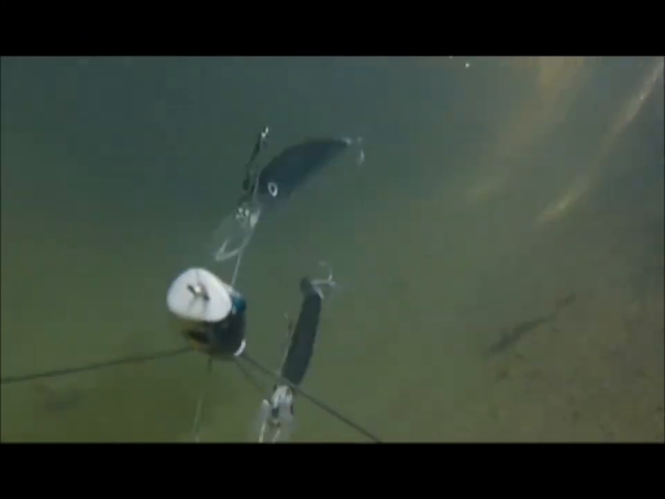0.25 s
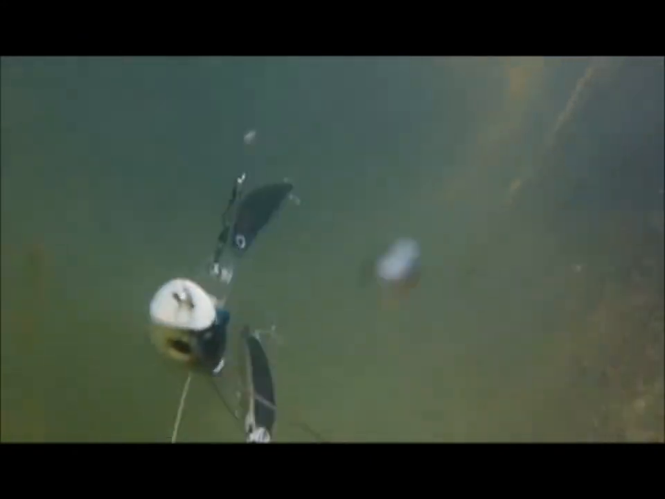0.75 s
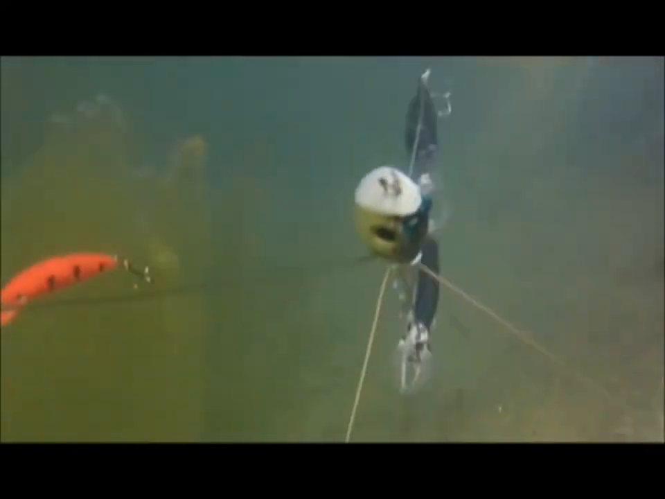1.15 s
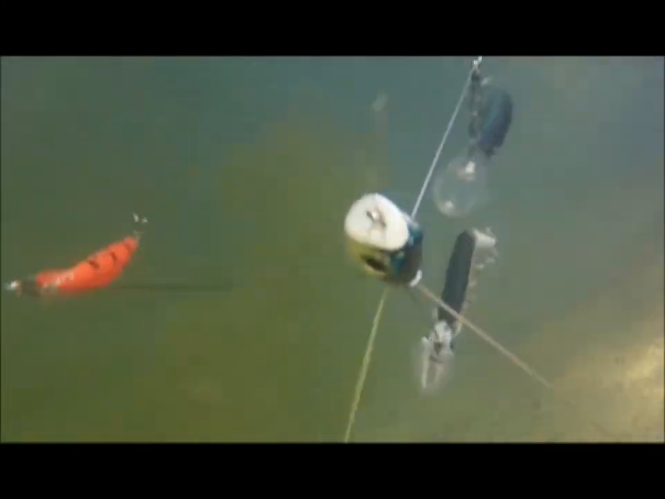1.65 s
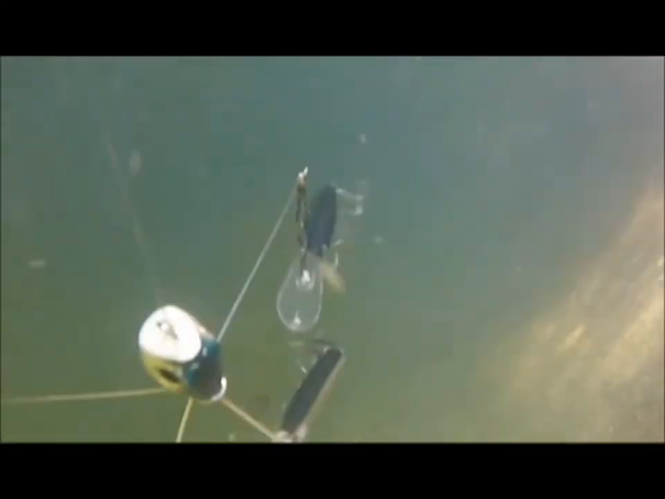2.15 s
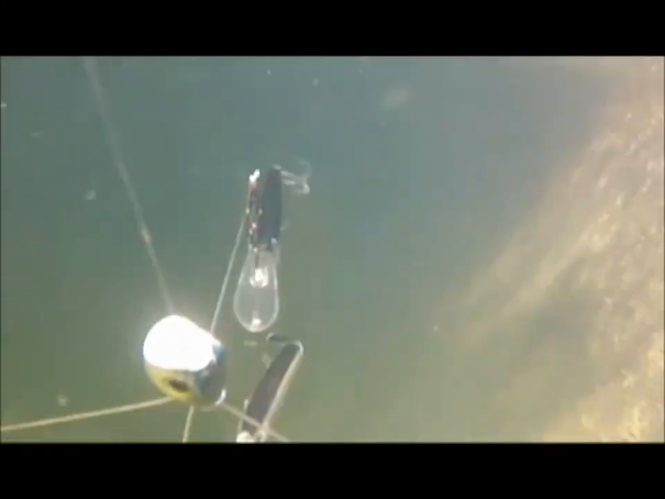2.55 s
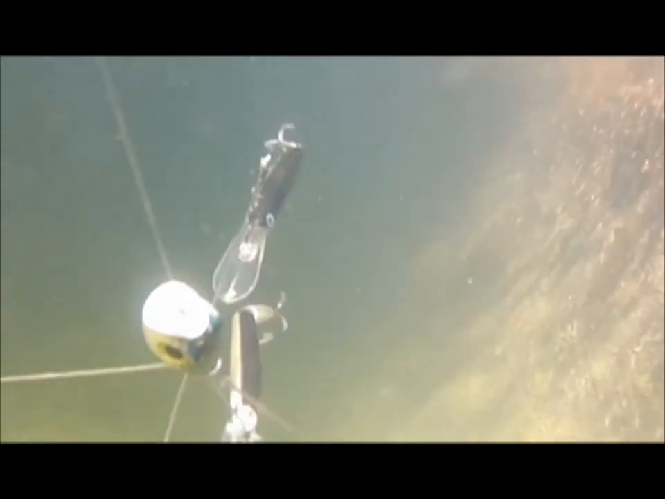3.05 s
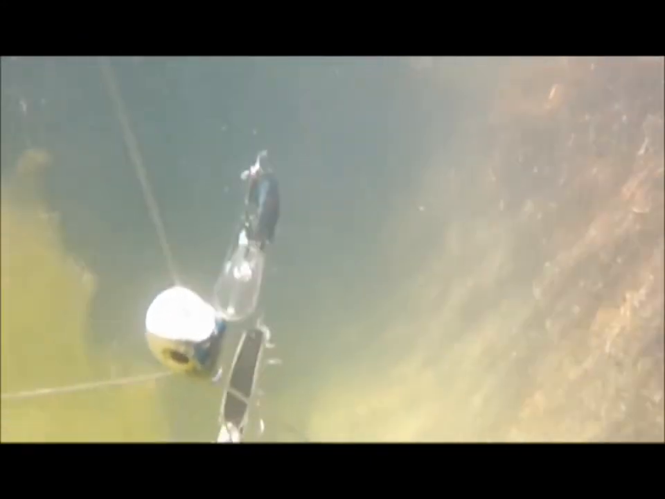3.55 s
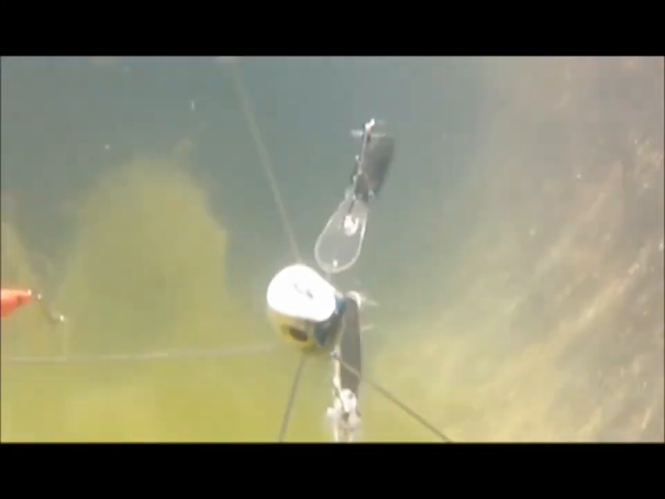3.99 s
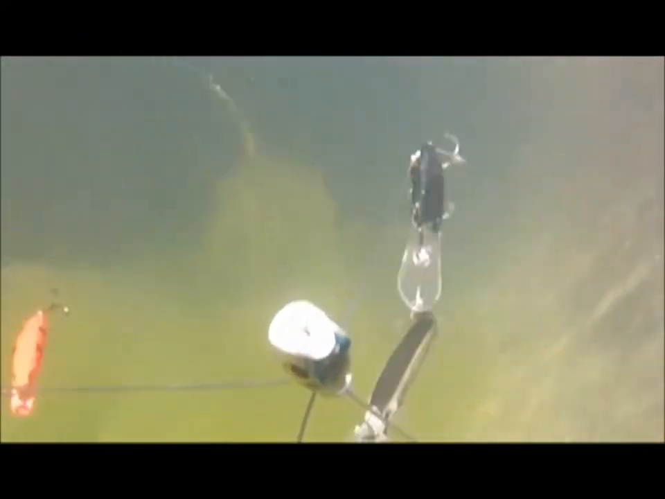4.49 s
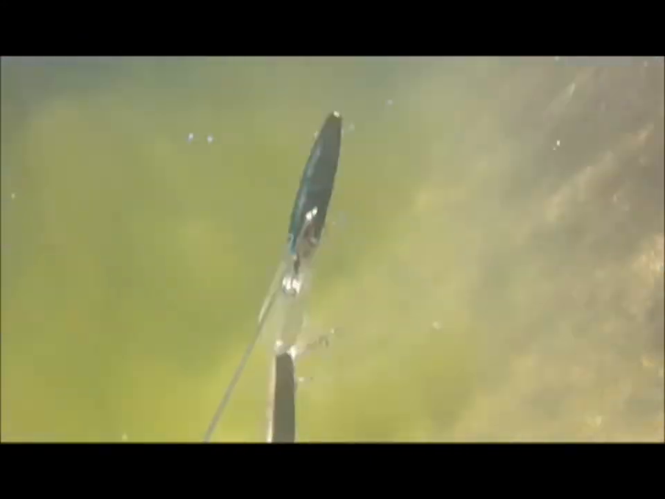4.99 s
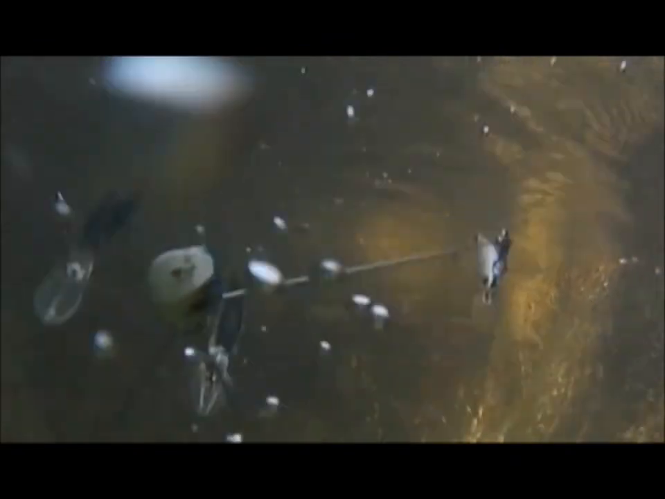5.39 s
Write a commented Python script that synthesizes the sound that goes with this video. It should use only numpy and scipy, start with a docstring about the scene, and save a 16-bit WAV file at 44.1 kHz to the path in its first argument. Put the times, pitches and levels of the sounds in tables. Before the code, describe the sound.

A close underwater microphone in a plastic case picks up deep flowing water, trapped air gulping around a mid-low note, and plinking bubbles. Fine steel clicks from fishing lures tick on top. A run of dull tugs near two seconds leaves a brief low line tone; a sparse quiet stretch follows, with a short gurgle, before tugs, chattering lures and a dense bubble burst close the scene.

```python
"""Fishing lures towed underwater

A camera in a sealed housing is towed through a lake behind a rig of fishing lures. Shaped noise makes the
water's rumble, hum, wash and hiss, and a wavering tone makes the ringing tow line. Fading tones make bubbles,
gulps of trapped air and lure ticks; noise through resonances makes the lures' chatter. Tugs push on the
housing's resonances, and near the end the bubbles thicken. Both channels are nearly alike."""
import sys
import numpy as np
from scipy import signal
from scipy.fft import rfft, irfft, next_fast_len
from scipy.io import wavfile
from scipy.ndimage import map_coordinates

SR = 44100
rng = np.random.default_rng(int(sys.argv[2]) if len(sys.argv) > 2 else 0)


def master_out(mix):
    """Clip the mix to full scale and print it as 16-bit PCM to the path in sys.argv[1]."""
    frames = np.transpose(np.atleast_2d(mix))
    ceiling = np.clip(frames, -1, 1)
    pcm = np.round(ceiling * 32767).astype(np.int16)
    wavfile.write(sys.argv[1], SR, pcm)


N = 248283  # length in samples

# In every table the dB values are relative: the functions below add their own trims.
# Fade times are the seconds taken to fall by 60 dB, held between 0.003 and 0.2 when played.

# Faint hiss. Each row: frequency in Hz, noise density in dB per Hz.
HISS_SPECTRUM = [(180, -61.5), (300, 25.5), (1010, -35), (1360, -8), (6100, -15.5), (7570, -48),
                 (9090, -9.5), (12100, -26), (16000, -17.5)]
# What differs between the channels. Each row: frequency in Hz, noise density in dB per Hz.
SIDE_SPECTRUM = [(59, -31), (100, -2), (482, -10), (558, -12), (2420, -17.5), (4730, -10), (15000, -11)]
# Flow past the housing. Each row: time in seconds, rumble level in dB, hum level in dB.
FLOW_LEVELS = [(0.0, -52.5, -63.5), (0.58, -58, -71), (1.18, -52.5, -61), (1.52, -56.5, -64),
               (1.83, -53, -64.5), (2.12, -55, -64), (2.22, -47, -53), (2.35, -50.5, -62),
               (2.59, -54, -70.5), (3.23, -56.5, -67), (4.03, -53, -68), (4.42, -61.5, -71),
               (5.0, -54.5, -82.5), (5.33, -50, -74), (5.43, -54.5, -59), (5.63, -54, -64)]
# Low rumble of the flow. Each row: frequency in Hz, noise density in dB per Hz.
RUMBLE_SPECTRUM = [(8.8, -20.5), (15, -2), (33, -1.5), (86, -18.5), (103, -20.5), (145, -20), (250, -64),
                   (320, -79), (550, -120)]
# Bubbly water churning at the port. Each row: time in seconds, wash level in dB, fizz level in dB.
CHURN_LEVELS = [(0, -74.5, -76), (.34, -72.5, -71), (.55, -70, -66), (.74, -72, -76), (1.15, -67.5, -69),
                (1.38, -75, -78), (1.74, -67.5, -69), (1.9, -73, -83), (2.15, -66, -85), (2.34, -77.5, -87),
                (2.42, -79.5, -85), (2.75, -78, -86), (2.93, -70.5, -72), (3.13, -78, -79),
                (3.95, -79.5, -81), (4.11, -74.5, -75.5), (4.24, -88, -79), (4.4, -63, -78),
                (4.68, -60, -74.5), (4.77, -74, -82), (4.92, -93, -88), (5.1, -68, -79), (5.36, -75, -75),
                (5.47, -62.5, -48), (5.55, -58, -54), (5.63, -57.5, -52)]
# Low wash of the churning water. Each row: frequency in Hz, noise density in dB per Hz.
WASH_SPECTRUM = [(88, -30.5), (150, -10), (210, -3), (300, -7.5), (404, -4), (441, -8), (572, -13),
                 (780, -15.5), (861, -31), (1160, -25.5), (1620, -29), (2180, -30.5), (2900, -40.5),
                 (3770, -78), (6380, -120)]
# Thin hiss within the fizz. Each row: frequency in Hz, noise density in dB per Hz.
FIZZ_SPECTRUM = [(410, -47.5), (700, -4), (787, -7), (943, -2), (1030, -30), (1250, -2), (1670, -4.5),
                 (1920, 0.5), (3070, -5.5), (4190, -14), (6260, -24.5), (7700, -20.5), (9470, -39.5),
                 (12100, -22), (15500, -46)]
# Taut line ringing on. Each row: time in seconds, level in dB.
LINE_LEVELS = [(2.3, -85), (2.37, -46.5), (2.6, -62.5), (2.66, -53), (2.8, -58.5), (2.9, -101)]
# Air pocket at the port, kept ringing by the flow. Each row: time in seconds, level in dB.
GURGLE_LEVELS = [(0.0, -58), (0.12, -69), (0.56, -79), (1.6, -89.5), (1.86, -61), (2.22, -74),
                 (2.38, -93.5), (4.01, -94), (4.22, -86.5), (4.61, -67.5), (4.77, -87), (5.02, -101),
                 (5.5, -70.5), (5.63, -59.5)]
# Gulps of the air pocket. Each row: start in seconds, level in dB, pitch in Hz, fade time in seconds.
AIR_GULPS = [(0.002, -37, 590, 0.027), (0.052, -48.5, 545, 0.1), (0.129, -43, 600, 0.032),
             (0.159, -47, 565, 0.072), (0.171, -42, 537, 0.094), (0.242, -37.5, 545, 0.047),
             (0.318, -36.5, 567, 0.025), (0.376, -53, 587, 0.087), (0.393, -51, 610.6, 0.16),
             (0.62, -49.5, 617, 0.042), (1.072, -37.5, 486, 0.019), (1.236, -49, 590, 0.041),
             (1.631, -47, 565, 0.063), (1.718, -36.5, 583, 0.054), (1.762, -38.5, 573, 0.051),
             (1.789, -55, 580.5, 0.23), (1.844, -39.5, 576, 0.16), (1.981, -55, 527, 0.065),
             (2.845, -50, 590, 0.025), (2.93, -50, 589, 0.042), (3.206, -75, 570, 0.051),
             (4.007, -57, 576, 0.047), (4.033, -58, 579, 0.15), (4.051, -35, 569, 0.024),
             (4.139, -50, 564, 0.047), (4.153, -41, 520, 0.021), (4.186, -54, 541, 0.066),
             (4.591, -57.5, 583, 0.29), (4.627, -49, 584, 0.06), (5.181, -41, 560, 0.022),
             (5.467, -72, 610, 0.042), (5.546, -51, 510, 0.036), (5.572, -45, 683, 0.089),
             (5.596, -36, 535, 0.056), (5.614, -50, 595, 0.07)]
# Soft-starting bubbles drifting free. Each row: start in seconds, level in dB, pitch in Hz,
# fade time in seconds.
FREE_BUBBLES = [(0.341, -59, 1710, 0.021), (.553, -47, 1370, 0.032), (.75, -55, 682, 0.07),
                (.914, -45.5, 2280, 0.031), (.965, -53.5, 860, 0.042), (1.114, -55.5, 847, 0.12),
                (1.164, -50, 2170, 0.025), (1.24, -40, 1412, 0.043), (1.358, -53, 1700, 0.044),
                (1.848, -58, 2130, 0.092), (2.979, -58, 1410, 0.037), (2.992, -60, 1390, 0.034),
                (2.995, -67, 2680, 0.016), (3.016, -58, 2320, 0.019), (3.073, -56.5, 580, 0.027),
                (3.114, -53.5, 3000, 0.024), (3.129, -61, 1650, 0.038), (4.011, -60, 1590, 0.062),
                (4.141, -59, 823, 0.14), (4.198, -51, 567, 0.038), (4.226, -51.5, 553, 0.025),
                (4.228, -65.5, 1145, 0.071), (5.197, -46, 2150, 0.015), (5.324, -50.5, 1800, 0.031),
                (5.333, -54, 980, 0.096), (5.493, -32, 2240, 0.026), (5.547, -40, 765, 0.038),
                (5.565, -49, 1410, 0.055), (5.61, -45.5, 1364, 0.061), (5.62, -44, 2070, 0.047)]
# Bubbles popping at the shell. Each row: start in seconds, level in dB, pitch in Hz,
# fade time in seconds, level of the knock over the ping in dB.
SHELL_BUBBLES = [(0.1863, -38.5, 3760, 0.009, -11), (0.2382, -46.5, 1380, 0.044, -34),
                 (0.3157, -55.5, 940, 0.06, -17), (0.3166, -54, 1975, 0.038, -12),
                 (0.3743, -57, 1220, 0.053, -22), (0.4129, -33.5, 2570, 0.006, -8.5),
                 (0.4347, -34.5, 2040, 0.0077, -12.5), (0.5097, -33.5, 1885, 0.014, -14.5),
                 (0.5359, -34.5, 1760, 0.012, -15), (0.5478, -34.5, 2330, 0.016, -18),
                 (0.6206, -29.5, 3490, 0.013, -14.5), (0.6855, -49, 1380, 0.037, -10),
                 (0.718, -55.5, 920, 0.031, -7), (0.8045, -48, 1470, 0.044, -31),
                 (0.8832, -59, 940, 0.057, -3), (0.9018, -59, 1390, 0.12, -11),
                 (0.9411, -55.5, 1560, 0.043, -9), (1.0237, -60, 1240, 0.011, 4),
                 (1.056, -55.5, 1390, 0.035, -19), (1.0707, -36, 1305, 0.013, -42),
                 (1.1068, -38.5, 1575, 0.018, -2.5), (1.1069, -30, 3320, 0.0089, -20),
                 (1.1303, -50, 2240, 0.023, -9), (1.1629, -61.5, 1400, 0.085, -8),
                 (1.1833, -55, 1530, 0.055, 2), (1.2116, -48.5, 2060, 0.023, -5),
                 (1.2491, -53, 1077, 0.024, -22), (1.2526, -24.5, 2234, 0.006, -10),
                 (1.2527, -25.5, 2930, 0.0076, -46), (1.2983, -54, 1760, 0.021, -12),
                 (1.3536, -58, 1240, 0.098, 2.5), (1.5993, -64.5, 1320, 0.17, 8),
                 (1.65, -59.5, 1048, 0.095, -6), (1.6742, -53.5, 1046, 0.039, -5),
                 (1.715, -48.5, 1305, 0.02, -9), (1.76, -58, 2550, 0.018, -1), (1.7848, -60, 1180, 0.1, -5),
                 (1.8364, -47.5, 1344, 0.066, -5.5), (1.8833, -42.5, 1300, 0.043, -10.5),
                 (2.0627, -41, 860, 0.02, -7.5), (2.1162, -66, 1090, 0.033, 4.5),
                 (2.188, -60, 1000, 0.014, -0.5), (2.2167, -63, 1350, 0.032, -2),
                 (2.2408, -59.5, 1200, 0.026, -7), (2.2982, -66.5, 1160, 0.021, 5.5),
                 (2.3236, -63, 1280, 0.03, -0.5), (2.4157, -56, 1240, 0.02, -16),
                 (2.557, -65, 1356, 0.064, -1.5), (2.6006, -67, 1450, 0.067, 2),
                 (2.6173, -58.5, 1160, 0.019, 2.5), (2.7612, -62.5, 2440, 0.03, -9),
                 (2.826, -73, 1650, 0.019, 9), (2.8464, -41.5, 1360, 0.04, -30),
                 (2.8838, -62, 2200, 0.022, -6), (2.8976, -53, 2300, 0.018, -1),
                 (2.9115, -54, 1257, 0.062, -17), (2.9299, -50, 1865, 0.033, -3),
                 (2.9616, -54.5, 1730, 0.026, -8), (3.1687, -68, 2000, 0.04, 1),
                 (3.2062, -48, 2555, 0.019, -9), (3.2577, -58, 2130, 0.019, -10),
                 (3.434, -65.5, 2210, 0.046, 7), (3.491, -66.5, 1380, 0.013, 8),
                 (3.7015, -54, 3320, 0.018, -10), (3.7573, -60.5, 2320, 0.04, -20),
                 (3.784, -58, 2700, 0.019, -5), (3.8698, -59.5, 2640, 0.028, -12),
                 (4.007, -51, 1385, 0.025, -5), (4.0506, -54, 1590, 0.056, -1.5),
                 (4.139, -57.5, 2250, 0.035, -9), (4.1958, -57.5, 1287, 0.065, -2),
                 (4.2841, -58, 1280, 0.05, 0), (4.5285, -58.5, 1164, 0.09, -9),
                 (4.8778, -62, 1390, 0.059, -3), (5.013, -54, 3040, 0.01, -15),
                 (5.0939, -62.5, 1160, 0.012, 1.5), (5.104, -57.5, 1820, 0.042, 3.5),
                 (5.1817, -40, 1250, 0.027, -41), (5.214, -43, 2000, 0.0083, -30),
                 (5.242, -45, 2190, 0.014, -15.5), (5.2659, -53, 1260, 0.025, 4),
                 (5.343, -61.5, 990, 0.012, 9.5), (5.3736, -45.5, 3020, 0.043, -7),
                 (5.3779, -51, 1980, 0.039, -11), (5.4018, -53, 2370, 0.032, -4),
                 (5.4157, -52, 2230, 0.062, -22), (5.4475, -54, 2000, 0.035, -16),
                 (5.462, -32.5, 2210, 0.022, -5), (5.474, -36.5, 1896, 0.035, 2.5),
                 (5.531, -44, 3370, 0.012, 0), (5.5192, -52, 1325, 0.16, 14.5),
                 (5.5848, -49, 1336, 0.082, -9)]
# High resonances of the shell. Each row: centre in Hz, width in Hz, strength in dB.
SHELL_MODES = [(577, 190, 4.5), (876, 40, -0.5), (1360, 420, 2), (1840, 170, -16), (2157, 170, 3),
               (2820, 190, -7), (3330, 120, -5.5)]
# Lures shaking between the ticks. Each row: time in seconds, level in dB.
SHAKE_LEVELS = [(0, -73.5), (1.74, -75.5), (1.88, -71), (1.95, -83.5), (2.44, -85.5), (2.5, -78),
                (4.2, -77), (4.64, -81), (5.33, -78), (5.39, -65.5), (5.55, -58.5), (5.63, -89)]
# Lure ticks, from sharp to barely heard. Each row: start in seconds, level in dB, pitch in Hz.
LURE_TICKS = [(0.0927, -55, 7800), (0.1504, -46, 7740), (0.325, -48, 4860), (0.434, -41, 12000),
              (0.5364, -33, 6300), (0.62, -89, 4500), (0.6673, -51, 6400), (0.8444, -48, 4560),
              (1.1066, -47, 4430), (1.108, -40, 12800), (1.162, -48, 11040), (1.2515, -57, 4760),
              (1.275, -40, 7160), (1.2989, -69, 5080), (1.4986, -47, 7060), (1.6078, -46, 5100),
              (1.6993, -46, 5100), (1.809, -53, 4990), (1.8367, -75, 4500), (2.0163, -57, 4650),
              (2.066, -60, 4530), (2.299, -74, 4400), (2.568, -45, 7600), (2.763, -45.5, 7650),
              (2.8474, -76, 5400), (2.939, -50, 4530), (3.0365, -85, 5510), (3.0799, -62, 5070),
              (3.1447, -51, 7800), (3.3158, -44.5, 7770), (3.5151, -46, 7540), (3.6132, -55, 5200),
              (3.706, -46, 7720), (3.828, -84, 4900), (3.911, -46, 7700), (3.9568, -62, 11800),
              (4.0068, -42, 11660), (4.055, -43, 7840), (4.1176, -60, 5030), (4.2134, -74, 4950),
              (4.286, -44, 7260), (4.3086, -46, 4940), (4.4058, -52, 4900), (4.501, -43.5, 6700),
              (4.701, -42, 6800), (4.7267, -46, 4970), (4.787, -52, 5460), (4.896, -44, 6600),
              (4.9264, -60, 4280), (5.0573, -39.5, 7500), (5.094, -56, 4730), (5.1264, -47, 12200),
              (5.1926, -72, 12300), (5.2155, -68, 4940), (5.2436, -44.5, 8500), (5.344, -44, 12900),
              (5.3735, -35, 7450), (5.4124, -35, 6000), (5.441, -38, 7600), (5.5685, -42, 4970),
              (5.599, -37.5, 4900)]
# Resonances of the steel in the lures. Each row: centre in Hz, width in Hz, strength in dB.
STEEL_MODES = [(4850, 1770, 4), (5590, 640, -10), (6650, 830, 0.5), (7630, 850, 2.5), (11690, 2700, -3.5),
               (14400, 1900, -19.5)]
# Pushes that make up the tugs on the housing. Each row: time in seconds, level in dB,
# spread of the push in ms, direction +1 or -1.
TUG_PUSHES = [(1.0257, -28, 0.79, 1), (1.047, -33, 1.45, -1), (1.056, -34.5, 1.43, 1),
              (1.239, -35, 0.59, -1), (1.261, -22, 0.88, 1), (1.2604, -54, 1.7, -1),
              (1.876, -44.5, 0.33, -1), (1.8776, -32, 0.47, 1), (1.8888, -15, 1.18, 1),
              (1.911, -21, 1.02, 1), (2.047, -37.5, 0.97, 1), (2.0657, -19.5, 0.88, 1),
              (2.093, -24.5, 0.95, 1), (2.1163, -28.5, 0.71, 1), (2.13, -38.5, 0.54, 1),
              (2.1447, -24, 1.2, 1), (2.158, -40.5, 0.62, 1), (2.1875, -26, 0.87, 1),
              (2.2178, -32, 0.66, 1), (2.2431, -26.5, 0.79, 1), (2.2997, -29, 0.81, 1),
              (2.3251, -33.5, 0.65, 1), (2.3559, -35.5, 0.69, 1), (2.469, -52.5, 0.53, -1),
              (2.6184, -31.5, 0.9, 1), (2.6245, -22, 1.07, -1), (5.267, -24, 0.69, 1),
              (5.292, -37, 0.65, 1), (5.318, -29, 0.71, 1), (5.3443, -28, 0.59, 1), (5.361, -26, 1.06, 1),
              (5.391, -26, 0.68, 1), (5.497, -34.5, 0.62, 1), (5.5378, -19.5, 2.54, 1)]
# Low resonances of the housing. Each row: centre in Hz, width in Hz, strength in dB.
HOUSING_MODES = [(56, 111, -3.5), (160, 25.2, -2.5), (211.2, 77, 1.5), (403.4, 52, -0.5), (595, 57, 10.5),
                 (669, 49, 13)]

CHANCE_POPS = 90  # more pops at chance moments, louder where the fizz is louder
CHANCE_DB, CHANCE_GROWS = -68.5, 0.55  # lowest level at a fizz of -75 dB, and dB gained per dB of fizz
UPPER_DB = -21.5  # middle level of a bubble's second ping under its first
FLURRY_DB, FLURRY_GROWS = -75, 0.52  # shake around a -50 dB tick, and dB gained per dB of tick
FLURRY_RISE_S, FLURRY_FALL_S = 0.0045, 0.016  # time to change by a factor of 2.7
SWING_S, SWING_AT_S = 0.1942, 2.555  # length of one even swing of the lures, start of one swing
SWING_FADE_DB = 4.5  # how far the shake sinks within a swing
TOP_HZ = 15800  # nothing passes above this


def amp(db):
    """Turn a level in dB into a gain."""
    return 10 ** (np.asarray(db) / 20)


def unit(x):
    """Scale x to an average strength (rms) of 1."""
    return x / np.sqrt(np.mean(x ** 2) + 1e-20)


def curves(rows):
    """Join the rows by straight lines: one curve for each column after the time."""
    s, *columns = np.transpose(rows)
    return [np.interp(np.arange(N) / SR, s, column) for column in columns]


def wobble(rate):
    """A smooth random curve through `rate` random points a second."""
    points = rng.standard_normal(int(N * rate / SR) + 4)
    return map_coordinates(points, [np.arange(N) * rate / SR])


def filtered(x, response):
    """Change each frequency of x by a complex response."""
    size = next_fast_len(N + SR // 2)
    spectrum = rfft(x, size) * response(np.fft.rfftfreq(size, 1 / SR))
    return irfft(spectrum, size)[..., :N]


def noise(points):
    """Random noise of rms 1 whose spectrum follows the (Hz, dB) points."""
    f, db = np.transpose(points)
    shape = lambda hz: amp(np.interp(np.log(hz + 1), np.log(f + 1), db))
    return unit(filtered(rng.standard_normal(N), shape))


def modes(table):
    """Response of a body that rings at the (Hz, width, dB) resonances when struck."""
    return lambda f: sum(amp(db) * 1j * f * width / (centre ** 2 - f ** 2 + 1j * f * width)
                         for centre, width, db in table)


def narrow(hz, width_hz):
    """Noise of rms 1 passed twice through one resonance, which gives it a blurred pitch."""
    ring = modes([(hz, width_hz, 0)])
    return unit(filtered(rng.standard_normal(N), lambda f: ring(f) ** 2))


def pings(s, db, hz, t60, rise, attack):
    """Fading tones that swell over `attack` seconds; pitch climbs by the share 2 * rise in each fade time."""
    t = np.arange(SR // 10) / SR
    t60 = np.clip(t60, .003, .2)
    s, db, hz, t60 = (np.reshape(v, (-1, 1)) for v in (s, db, hz, t60))
    envelope = amp(db - 60 * t / t60) * (1 - np.exp(-t / attack))
    wave = envelope * np.sin(2 * np.pi * hz * t * (1 + rise * t / t60))
    at = np.round(s * SR).astype(int) + np.arange(len(t))
    return np.bincount(at.ravel(), wave.ravel(), N + SR)[:N]


def flow():
    """Water moving past the housing: low noise for the rumble and pitched noise for a wavering hum."""
    rumble_db, hum_db = curves(FLOW_LEVELS)
    rumble = amp(rumble_db + 1.5 * wobble(6)) * noise(RUMBLE_SPECTRUM)
    hum = amp(hum_db + 2.5) * narrow(146.7, 15.5)
    return rumble + hum


def swarm(fizz_db, swirl):
    """Many tiny bubbles, each a short tone; louder fizz holds more of them."""
    crowd = np.cumsum(amp(.25 * fizz_db))
    draw = rng.random((1100, 4))
    at = np.searchsorted(crowd, draw[:, 0] * crowd[-1] * .9999)
    hz = 1050 * 4 ** draw[:, 1] ** 1.3
    # most are faint, a few stand out, and higher ones tend to be softer
    size_db = .75 * fizz_db[at] + 2 * swirl[at] - 4 * np.log(draw[:, 2] + .02) - 4 * np.log2(hz / 1000)
    fade_s = (12 + 70 * draw[:, 3] ** 2) / hz
    notes = pings(at / SR, size_db - 15.5, hz, fade_s, .06, .001)
    return notes * amp(2.5 * wobble(250))


def churn():
    """Churning water: a low wash, and a fizz of thin hiss under a swarm of small bubbles."""
    wash_db, fizz_db = curves(CHURN_LEVELS)
    swirl = wobble(25)  # eddies lift wash and fizz together
    wash = unit(amp(2.5 * swirl + 2.5 * wobble(120)) * noise(WASH_SPECTRUM))
    hiss = unit(amp(1.5 * swirl + 4.5 * wobble(200)) * noise(FIZZ_SPECTRUM))
    return amp(wash_db + 2) * wash + amp(fizz_db - 5) * hiss + swarm(fizz_db, swirl)


def line():
    """The taut tow line rings on after a run of tugs: one pure tone wavering near 75 Hz."""
    phase = 2 * np.pi * np.cumsum(75 + 1.4 * wobble(2.7)) / SR
    return amp(curves(LINE_LEVELS)[0]) * np.sqrt(2) * np.sin(phase)


def pocket():
    """Trapped air gurgles around one note, and each gulp is a softly swelling, fading tone."""
    s, db, hz, t60 = np.transpose(AIR_GULPS)
    level_db = curves(GURGLE_LEVELS)[0]
    gurgle = amp(level_db + 4 + 2.5 * wobble(30)) * narrow(585, 80)
    gulps = pings(s, db + 6, hz, t60, .02, .006)
    return gurgle + gulps * amp(1.45 * wobble(90))


def drifters():
    """Free bubbles swell, climb a little in pitch and fade."""
    notes = pings(*np.transpose(FREE_BUBBLES), .04, .003)
    return amp(-0.5 + 3.4 * wobble(200)) * notes


def chance_pops():
    """Chance rows with the columns of SHELL_BUBBLES; livelier fizz holds more and louder pops."""
    lift_db = CHANCE_GROWS * (curves(CHURN_LEVELS)[1] + 75)
    crowd = np.cumsum(amp(.3 * lift_db))
    draw = rng.random((CHANCE_POPS, 5))
    at = np.searchsorted(crowd, draw[:, 0] * crowd[-1] * .9999)
    db = lift_db[at] + CHANCE_DB + 8 * draw[:, 1]
    hz = 1200 * 2.3 ** draw[:, 2]
    fade_s = 0.012 + 0.026 * draw[:, 3]
    knock_db = 10 * draw[:, 4] - 6
    return np.transpose([at / SR, db, hz, fade_s, knock_db])


def bubbles():
    """Each pop gives two unsteady pings and a short noise knock that rings the shell."""
    s, db, hz, t60, knock_db = np.concatenate([SHELL_BUBBLES, chance_pops()]).T
    t, knocks = np.arange(600) / SR, np.zeros(N + SR)
    for at, level in zip(s, db + knock_db):
        fade = amp(level + 11.5 - 60 * t / 0.015)
        knocks[round(at * SR):][:600] += fade * rng.standard_normal(600)
    draw = rng.random((len(s), 2))
    upper_hz = 2550 * 1.8 ** draw[:, 0] ** 2
    upper_db = UPPER_DB + 12 * (draw[:, 1] - .5)
    lower = pings(s, db + 2, hz, t60, .03, .0012)
    upper = pings(s, db + upper_db + 2, upper_hz, .6 * t60, .02, .0007)
    unsteady = amp(3 * wobble(300))
    shell = modes(SHELL_MODES)
    damped = lambda f: shell(f) / (1 + 1j * f / 4000) ** 2  # the plastic swallows the top
    return (lower + upper) * unsteady + filtered(knocks[:N], damped)


def shaking():
    """Strength of the lures' shake: it sinks within each swing and flurries around each tick."""
    s, db, _ = np.transpose(LURE_TICKS)
    jolts = np.bincount((s * SR).astype(int), amp(FLURRY_DB + FLURRY_GROWS * (db + 50)), N)
    t = np.arange(-SR // 5, SR // 5 + 1) / SR
    flurry = np.exp(np.where(t < 0, t / FLURRY_RISE_S, -t / FLURRY_FALL_S))
    swing = (np.arange(N) / SR - SWING_AT_S) / SWING_S % 1  # runs from 0 to 1 in each swing
    steady = amp(curves(SHAKE_LEVELS)[0] + SWING_FADE_DB * (.5 - swing ** 2))
    return steady + np.abs(signal.fftconvolve(jolts, flurry, "same"))


def rattle():
    """Loose steel chatters as bursts of noise through its resonances; ticks are very short tones."""
    draw = rng.random((1100, 2))
    at = (draw[:, 0] * (N - 1)).astype(int)
    hits = np.bincount(at, amp(-4 * np.log(draw[:, 1] + 0.1)), N)
    fade = amp(-60 * np.arange(700) / SR / .016)
    burst = np.convolve(hits, fade)[:N] + .3  # never quite silent between hits
    chatter = np.zeros(N)
    for centre, width, db in STEEL_MODES:
        ring = modes([(centre, width, 0)])
        grain = burst * amp(3.5 * wobble(70)) * rng.standard_normal(N)  # each mode varies on its own
        chatter += filtered(grain, lambda f: ring(f) ** 2 * amp(db))
    s, db, hz = np.transpose(LURE_TICKS)
    ticks = pings(s, db - 10, hz, np.full(len(s), 0.0088), 0, 0.00026)
    return amp(-4.5) * shaking() * unit(chatter) + ticks * amp(3.7 * wobble(1500))


def tugs():
    """Tugs are one or more soft, bell-shaped pushes that set the low resonances of the housing ringing."""
    t, push = np.arange(-300, 300) / SR, np.zeros(N + SR)
    for s, db, ms, way in TUG_PUSHES:
        bell = np.exp(-.5 * (t * 1000 / max(ms, .2)) ** 2)
        start = round((s - .0005) * SR) - 300
        push[start:][:600] += np.sign(way) * amp(db + 42.5) * bell / bell.sum()
    return filtered(push[:N], modes(HOUSING_MODES))


def scene():
    """Add all sources in the centre; a faint noise that follows the shake differs between channels."""
    background = amp(-83.5) * noise(HISS_SPECTRUM) + flow() + churn() + line()
    middle = background + pocket() + drifters() + bubbles() + rattle() + tugs()
    side = shaking() * amp(-26.5 + 2.5 * wobble(22)) * noise(SIDE_SPECTRUM)
    return np.array([middle + side, middle - side])


def record(dry):
    """Loud peaks flatten at the top of the input range and pull the gain down for a moment."""
    top = amp(-24.4)
    excess = np.maximum(np.abs(dry).max(axis=0) / top - .8, 0)
    t = np.arange(SR // 2) / SR
    reaction = np.exp(-t / 0.053) - np.exp(-t / 0.0066)  # slow to act, slower to let go
    pull = signal.fftconvolve(excess, reaction)[:N]
    held = dry / (1 + 0.044 * np.abs(pull))
    flat = held / (1 + np.abs(held / top) ** 8) ** (1 / 8)
    return filtered(flat, lambda hz: hz < TOP_HZ)


dry = scene()
out = record(dry)
master_out(out)
```